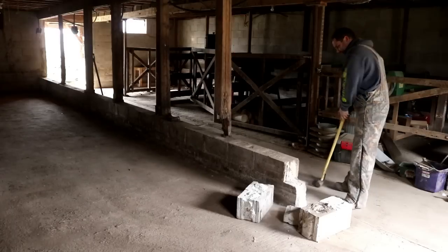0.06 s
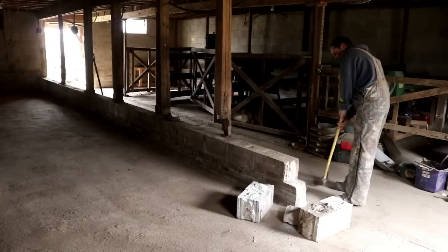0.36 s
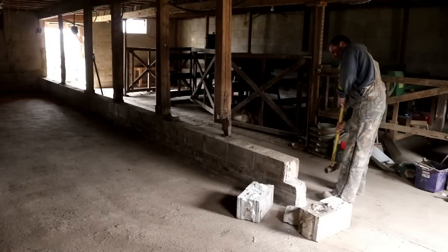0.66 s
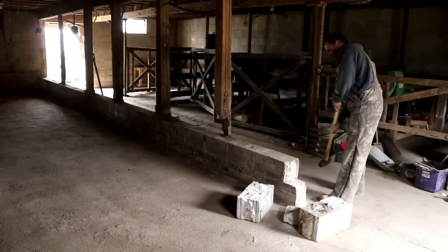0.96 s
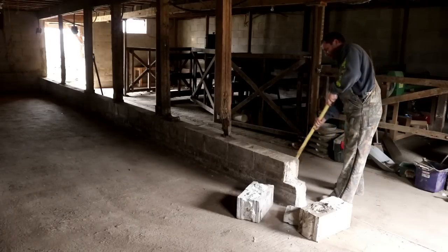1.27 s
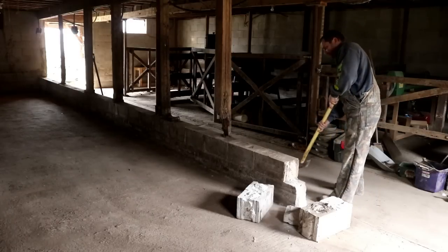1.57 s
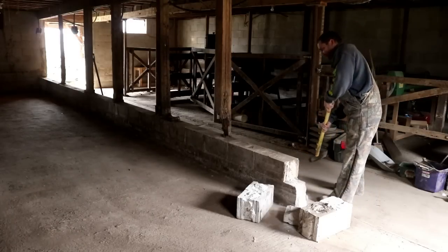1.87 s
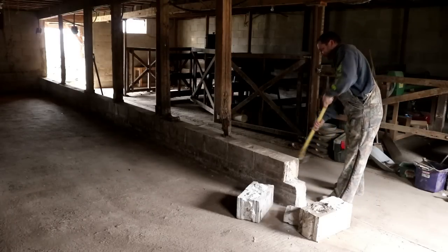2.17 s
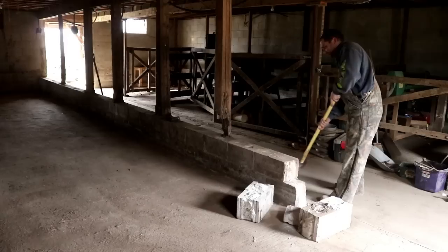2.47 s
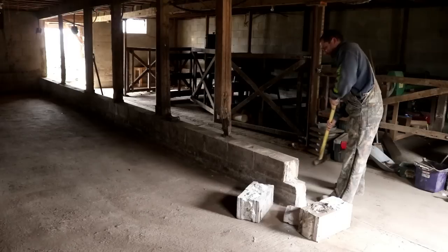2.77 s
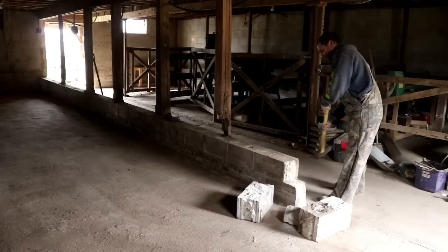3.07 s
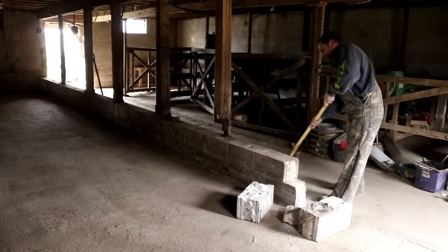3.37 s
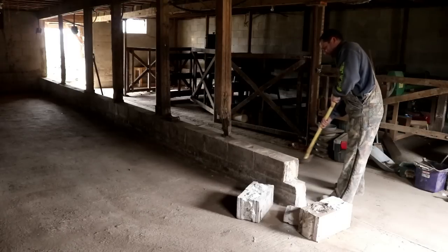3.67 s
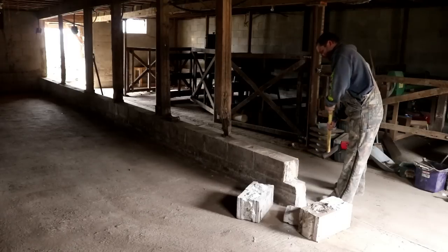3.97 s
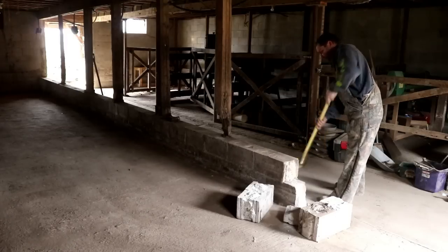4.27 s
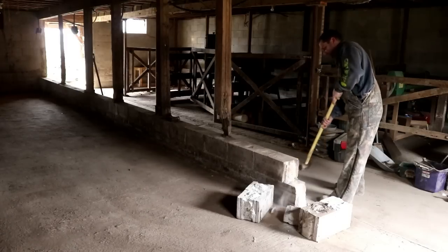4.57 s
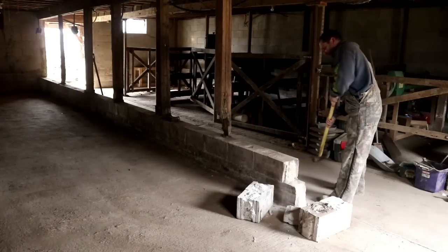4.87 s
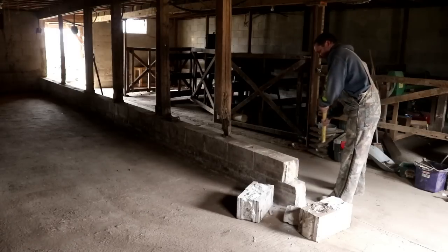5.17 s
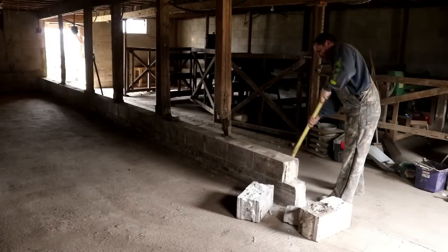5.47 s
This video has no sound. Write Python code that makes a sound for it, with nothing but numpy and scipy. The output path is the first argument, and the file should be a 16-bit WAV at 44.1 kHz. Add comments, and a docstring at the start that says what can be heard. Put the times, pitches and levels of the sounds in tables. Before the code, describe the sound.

Five short, stony sledgehammer blows on masonry boom through a barn; after the fourth, a block thuds down among ticking chips.

```python
"""Soles shift on a dusty slab in a barn, then a worker drives a steel maul five times into a block wall.
Each blow reaches the microphone as a short stony knock, with a spray of grit, a thin ring of the maul
head and the long roar of the barn behind it. The fourth breaks a block out of its mortar: it thuds
to the floor among ticking chips. The camera's gain control ducks under each blow, recovers as the
echo dies, and lets the first peak clip."""
import sys
import numpy as np
from scipy import signal
from scipy.fft import rfft, irfft, next_fast_len
from scipy.io import wavfile
from scipy.ndimage import uniform_filter1d

SR = 44100
rng = np.random.default_rng(int(sys.argv[2]) if len(sys.argv) > 2 else 0)


def int16_out(signal):
    """Quantize to a 16-bit WAV file."""
    q = np.round(np.clip(np.atleast_2d(signal).T, -1, 1) * 32767)
    wavfile.write(sys.argv[1], SR, q.astype(np.int16))


N = 252145
LIFE = np.arange(2 * SR) / SR  # time since a sound's onset [s]


def amp(db):
    """Decibels to gain."""
    return 10 ** (np.asarray(db) / 20)


def unit(x):
    """Scale to rms 1."""
    return x / np.sqrt(np.mean(x ** 2) + 1e-20)


def along(points, hz):
    """Read (frequency [Hz], value) points on a log frequency axis."""
    freqs, values = np.transpose(points)
    return np.interp(np.log(hz + 1), np.log(freqs + 1), values)


def filtered(x, response):
    """Filter x by a gain given as a function of frequency."""
    size = next_fast_len(len(x) + SR // 4)
    return irfft(rfft(x, size) * response(np.fft.rfftfreq(size, 1 / SR)), size)[:len(x)]


def noise(level_db, size=len(LIFE)):
    """Noise of rms 1 whose spectrum in dB is a function of frequency."""
    return unit(filtered(rng.standard_normal(size), lambda hz: amp(level_db(hz))))


def fade(t60, hold_s=0):
    """Hold, then decay by 60 dB in t60 seconds."""
    return np.exp(-np.log(1000) * np.maximum(LIFE - hold_s, 0) / t60)


def rise(seconds):
    """Soft attack."""
    return 1 - np.exp(-(LIFE / seconds) ** 2)


def add(track, start_s, sound):
    """Mix a sound into the track at start_s."""
    part = track[round(start_s * SR):][:len(sound)]
    part += sound[:len(part)]


def room_tone(level_db=-52.5):
    """The barn's faint, steady rumble and hiss around the microphone."""
    # background spectrum: (frequency [Hz], relative level [dB])
    air = [(15, -38.5), (25, -12), (64, -1), (108, -14.5), (175, -16.5), (236, -15.5), (1200, -19),
           (1700, -26.5), (2160, -25), (2840, -27.5), (3920, -33.5), (11300, -39.5), (16000, -39.5)]
    return amp(level_db) * noise(lambda hz: along(air, hz), N)


def shuffle():
    """At each shift a sole takes the weight and scuffs the dusty slab; both die away in the barn."""
    # shifts of the feet: (time [s], length [s], weight level [dB], scuff level [dB])
    shifts = [(0.0, 0.042, -44.5, -48.5), (0.139, 0.048, -43, -63), (0.235, 0.062, -49, -61.5)]
    # the shoe under load: (frequency [Hz], relative level [dB])
    sole = [(47, -44), (80, -12), (129, -4.5), (167, -17), (243, -2.5), (374, -0.5), (594, -10),
            (1200, -24), (1560, -37), (2640, -120)]
    # its rub on dust: (frequency [Hz], relative level [dB])
    rub = [(530, -9), (900, 9.5), (1530, 1), (1980, 6), (3750, -5), (4160, -7.5), (9000, -23), (11700, -58),
           (19800, -120)]
    out = np.zeros(N)
    for start_s, length_s, weight_db, scuff_db in shifts:
        weight = noise(lambda hz: along(sole, hz)) * fade(0.57, hold_s=length_s)
        scuff = noise(lambda hz: along(rub, hz)) * fade(1, hold_s=length_s)
        add(out, start_s, (amp(weight_db) * weight + amp(scuff_db) * scuff) * rise(0.002))
    return out


def thuds():
    """A shoe, and later the loosened block, land dully on the concrete floor; the barn answers faintly."""
    # landings: (time [s], level [dB], echo relative to the contact [dB])
    landings = [(0.862, -21, -19.5), (4.532, -10, -28), (4.617, -3.5, -34), (4.686, -10, -31)]
    # a heavy, soft contact with the slab: (frequency [Hz], relative level [dB])
    thud = [(47, -50), (80, -25), (150, -14.5), (250, -4.5), (411, -6), (553, -15), (988, -18.5),
            (1200, -28), (1790, -32), (2800, -42), (3640, -39), (6160, -120)]
    out = np.zeros(N)
    colour = lambda hz: along(thud, hz)
    for start_s, level_db, echo_db in landings:
        contact = noise(colour) * fade(0.033) * rise(0.0024)
        echo = amp(echo_db) * barn_echo(colour, build_s=0.0044)
        add(out, start_s, amp(level_db) * (contact + echo))
    return out


def barn_echo(colour, build_s=0.00047, patchy_db=2.0, flutter_db=1.0):
    """Diffuse echo of a knock of the given colour: barn resonances stand out and the treble dies first."""
    # reverberation of the barn: (frequency [Hz], t60 [s])
    decay_times = [(100, 1.09), (260, 0.97), (700, 1.04), (1800, 0.79), (4800, 0.53), (12000, 0.22)]
    # its resonances: (centre [Hz], width [Hz], gain [dB])
    resonances = [(189, 9, -4), (252, 7.4, 7.5), (292.4, 5.8, 9), (356, 2.9, 6.5), (650, 30, -1)]
    boom_db = lambda hz: sum(db / (1 + (2 * (hz - centre) / width) ** 2)
                             for centre, width, db in resonances)
    wash = noise(lambda hz: colour(hz) + boom_db(hz))
    hz, t, spectrum = signal.stft(wash, SR, nperseg=1024)
    decay = np.exp(-np.log(1000) * t / along(decay_times, hz)[:, None])
    # reflections off posts and walls arrive in clumps and comb the spectrum
    patches = uniform_filter1d(rng.standard_normal(spectrum.shape), size=2, axis=0)
    patches = unit(uniform_filter1d(patches, size=9, axis=1))
    clumps = unit(uniform_filter1d(rng.standard_normal(len(t)), size=2))
    ripple = amp(patchy_db * patches + flutter_db * clumps)
    _, tail = signal.istft(spectrum * decay * ripple, SR, nperseg=1024)
    return tail[:len(LIFE)] * rise(build_s)


def knock(pitch_hz, crack_db, crack_delay_s=0.0042, snap_s=0.000288, grit_db=-7):
    """The block's damped modes swell under the steel; then the mortar cracks in one pressure swing."""
    # modes of the block: (frequency [multiple of its pitch], level [dB], t60 [s])
    modes = [(.25, -18.5, .03), (.5, -14, .016), (1.002, 7.5, 0.018), (1.298, -20.5, 0.075),
             (1.95, -3, 0.0063), (2.602, -15, 0.011)]
    # concrete crushed under the face: (frequency [Hz], relative level [dB])
    crushed = [(150, 1), (500, 3), (1150, 2.5), (3200, -5), (6000, -21.5), (15000, -39)]
    ring = sum(amp(db) * np.sin(2 * np.pi * ratio * pitch_hz * LIFE) * fade(t60)
               for ratio, db, t60 in modes)
    swing = (LIFE - crack_delay_s) / snap_s
    crack = amp(crack_db) * swing * np.exp(-swing ** 2)
    stone = ring * rise(0.003) + crack
    grit = noise(lambda hz: along(crushed, hz)) * fade(0.023) * rise(0.0031)
    add(stone, crack_delay_s / 2, amp(grit_db) * grit)  # grit joins in while the face sinks in
    return stone


def spray(t60=0.26, clump_db=3):
    """Grit flies off the struck face in a short, uneven hiss."""
    # flying grit: (frequency [Hz], relative level [dB])
    grit = [(1000, -18), (3000, -3), (5500, -3.5), (8000, -17), (12000, -17), (16000, -31)]
    clumps = unit(uniform_filter1d(rng.standard_normal(len(LIFE)), size=60))
    hiss = noise(lambda hz: along(grit, hz))
    return unit(hiss * amp(clump_db * clumps)) * fade(t60) * rise(0.002)


def head_ring(strike_levels_db, direct_db=6, half_width_hz=24):
    """The steel head rings straight to the microphone, then on in echoes that make each mode flutter."""
    # modes of the head: (frequency [Hz], relative level [dB], t60 of the echoes [s])
    modes = [(4694, 3, .62), (5475, 4, .62), (6718, -1, .48)]
    ring = np.zeros(len(LIFE))
    # where the head lands decides which modes speak
    for (hz, db, t60), strike_db in zip(modes, strike_levels_db):
        direct = np.sin(2 * np.pi * hz * LIFE) * fade(t60 / 2)
        echoes = noise(lambda f: -20 * np.log10(1 + ((f - hz) / half_width_hz) ** 2)) * fade(t60)
        ring += amp(db + strike_db) * (amp(direct_db) * direct + echoes)
    return ring * rise(0.0017)


def maul(roar_db=2, lag_s=0.0028):
    """Steel on the wall: the knock arrives first, then flying grit, the ringing head and the barn's roar."""
    # blows: (time [s], knock [dB], block pitch [Hz], cracking [0-1], bass [dB], hollowness [dB],
    # spray [dB], strike on the head's first, second and third mode [dB])
    blows = [(1.3025, 25.9, 1050, 0.19, 0.5, 3.1, -32, -39, -50, -48),
             (2.2545, 25, 1120, 0.63, -1.5, 0.63, -35, -43.5, -39.5, -35),
             (3.3081, 22.9, 1003, 0.43, 2, 0.38, -26, -34, -37.5, -49),
             (4.3190, 24.3, 807, 0.84, 0, 5, -26, -33.5, -48, -36.5),
             (5.4352, 22.5, 1048, 0.97, 6, 1.8, -38, -39, -42, -52)]
    # the wall heard through the barn: (frequency [Hz], relative level [dB])
    wall = [(18, -73), (30, -12.5), (65, -11.5), (163, -14), (240, -2.5), (384, -1), (485, -4.5),
            (662, 2.5), (754, 0), (1300, -1.5), (4420, -22.5), (4780, -25), (5880, -37), (11600, -50.5),
            (15000, -99.5)]
    out = np.zeros(N)
    for start_s, knock_db, pitch_hz, cracking, bass_db, hollow_db, spray_db, *strike_levels_db in blows:
        # the more the mortar cracks, the sharper the snap and the duller the roar
        crack_db = 1.5 + 15.5 * cracking
        treble_db = 1.5 - 7 * cracking
        # tilt of this roar: (frequency [Hz], gain [dB])
        tilt = [(90, 0), (180, bass_db), (300, hollow_db), (700, 0), (1250, 0), (1700, treble_db)]
        # every swing fills the barn about equally
        roar = amp(roar_db) * barn_echo(lambda hz: along(wall, hz) + along(tilt, hz))
        add(out, start_s, amp(knock_db) * knock(pitch_hz, crack_db))
        add(out, start_s + lag_s, roar + amp(spray_db) * spray() + head_ring(strike_levels_db))
    return out


def scrape(start_s=1.971, level_db=-52):
    """The maul head grazes the block as it is drawn back."""
    # steel brushing concrete: (frequency [Hz], relative level [dB])
    graze = [(1000, -18), (2500, 12), (4200, 11), (7000, -8), (15000, -17)]
    out = np.zeros(N)
    rasp = noise(lambda hz: along(graze, hz)) * rise(0.004) * fade(0.35)
    add(out, start_s, amp(level_db) * rasp)
    return out


def chips(grain_count=200, scatter_s=0.03, size_range_db=9, late_loss_db=11):
    """Bits of mortar tick on the floor and crumble into grains, each with its own brief pitch."""
    # chips landing: (time [s], base level of their grains [dB])
    landings = [(4.533, -39), (4.607, -48), (4.615, -50), (4.6566, -44.5), (4.6827, -51), (4.729, -57)]
    # how strongly a grain rings at each pitch: (frequency [Hz], gain [dB])
    colour = [(2000, -4), (5000, 9), (8000, -3.5), (12000, -5), (16000, -10)]
    out = np.zeros(N)
    t = LIFE[:SR // 50]
    envelope = (fade(0.0063) * rise(0.00017))[:len(t)]
    for start_s, level_db in landings:
        for late, pitch, smallness in rng.random((grain_count, 3)):
            delay_s = -scatter_s * late * np.log(1 - late)  # grains crowd at the contact, then thin out
            hz = 3500 + 12000 * pitch
            grain_db = level_db + along(colour, hz) - size_range_db * smallness - late_loss_db * late
            add(out, start_s + delay_s, amp(grain_db) * np.sin(2 * np.pi * hz * t) * envelope)
    return out


def scene():
    """The work at the wall, heard in mono from one spot in the barn."""
    return (room_tone() + maul() + thuds() + chips() + shuffle() + scrape())[None]


def gain_control(x, target_db=-20, depth_db=20, release_db_per_s=72, window_s=0.019, ahead_s=0.0028):
    """The camera looks ahead, ducks loud sound toward the target level and recovers at a steady rate."""
    t = np.arange(N) / SR
    power = np.abs(uniform_filter1d(x ** 2, int(window_s * SR)))
    level_db = 10 * np.log10(power + 1e-12)
    needed_db = np.clip(target_db - level_db, -depth_db, 0)
    needed_db = np.minimum(needed_db, np.interp(t + ahead_s, t, needed_db))
    recovery_db = release_db_per_s * t
    gain_db = np.minimum.accumulate(needed_db - recovery_db) + recovery_db
    return x * amp(uniform_filter1d(gain_db, size=SR // 150))


def record(dry, low_cut_hz=36, ceiling=0.71, top_hz=16000):
    """Behind the camera's microphone: gain control, a low cut, an overloaded input and a steep high cut."""
    x = gain_control(dry[0])
    x = signal.sosfilt(signal.butter(1, low_cut_hz, "highpass", fs=SR, output="sos"), x)
    x = x / (1 + np.abs(x / ceiling) ** 10) ** (1 / 10)  # peaks flatten at the ceiling
    return filtered(x, lambda hz: 1 / (1 + (hz / top_hz) ** 120))[None]


dry = scene()
out = record(dry)
int16_out(out)
```